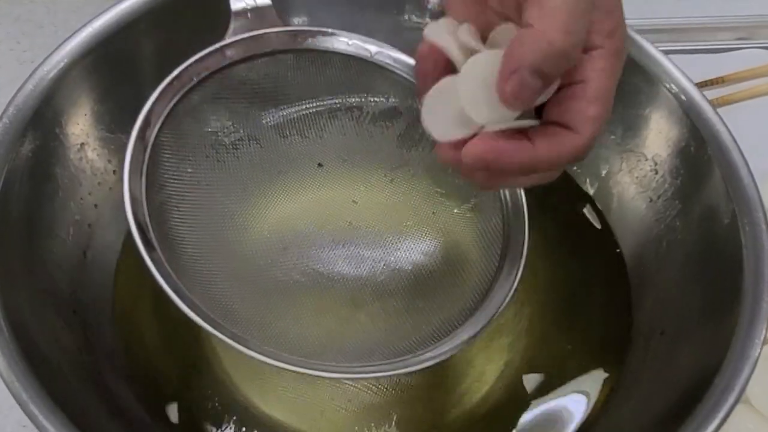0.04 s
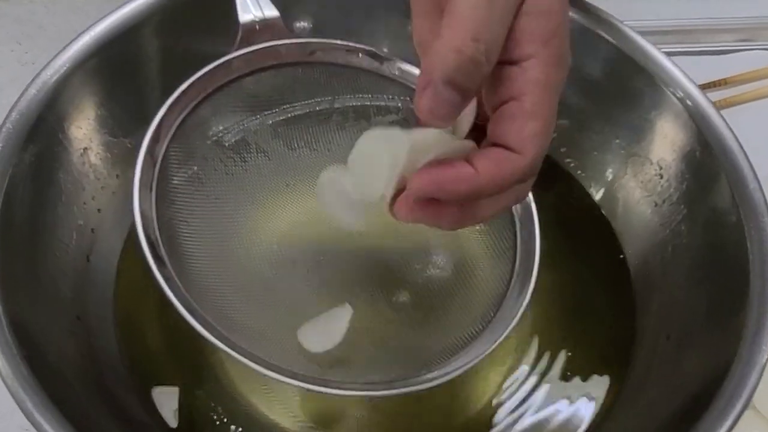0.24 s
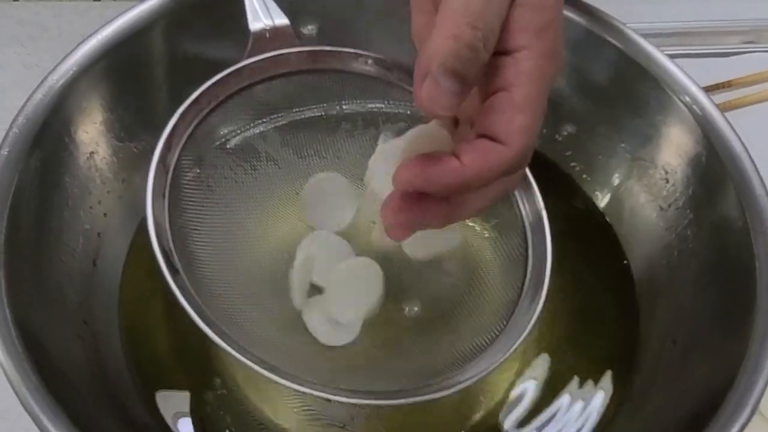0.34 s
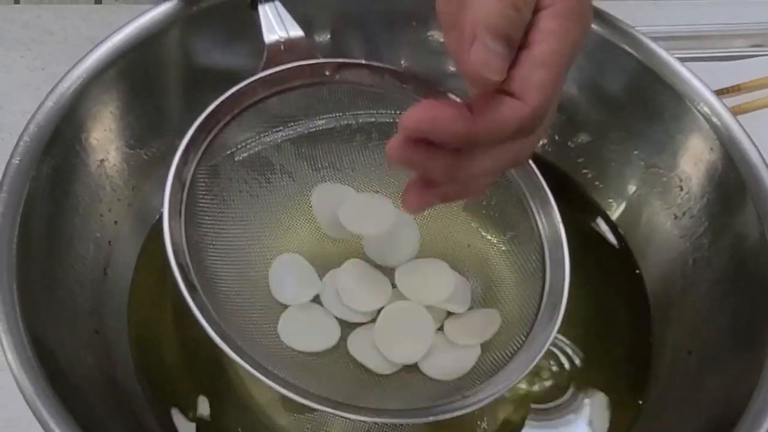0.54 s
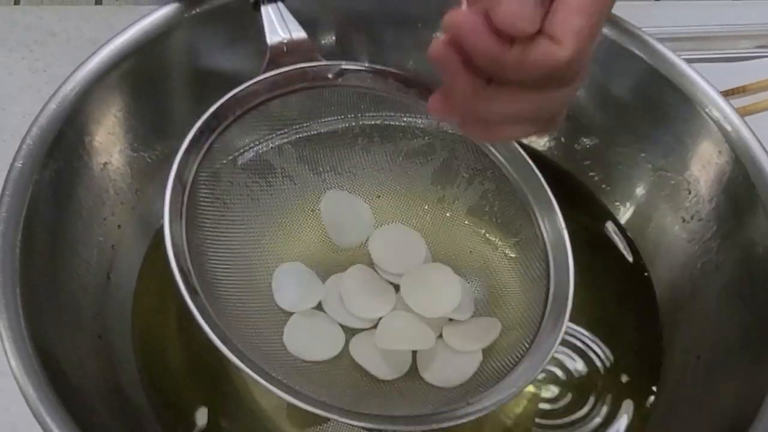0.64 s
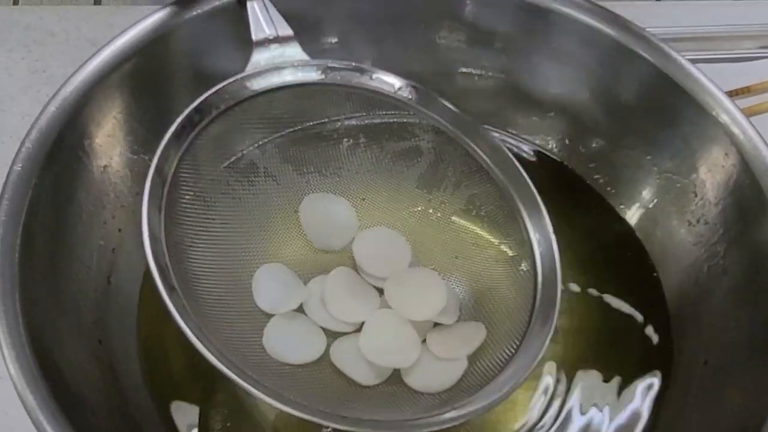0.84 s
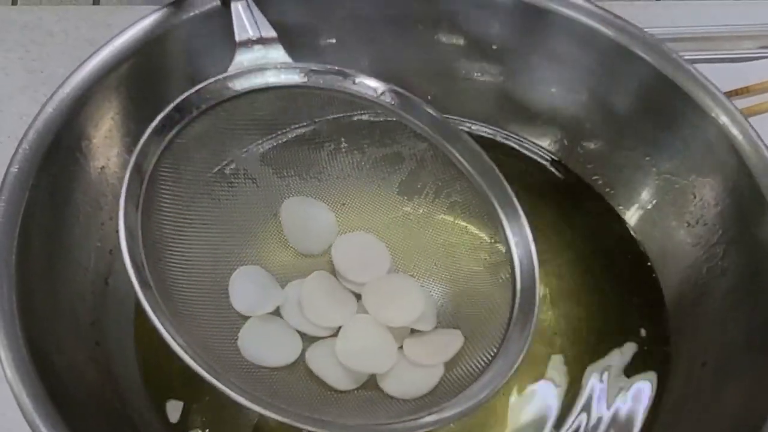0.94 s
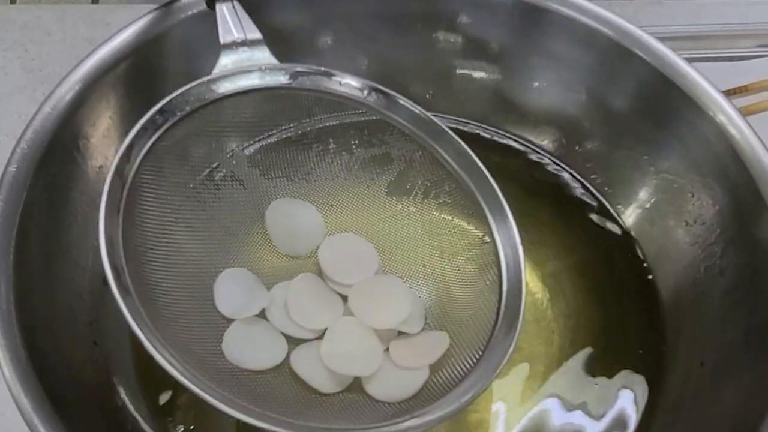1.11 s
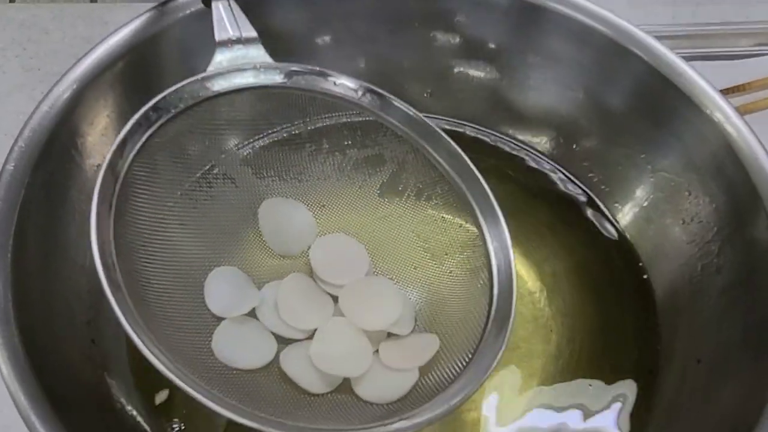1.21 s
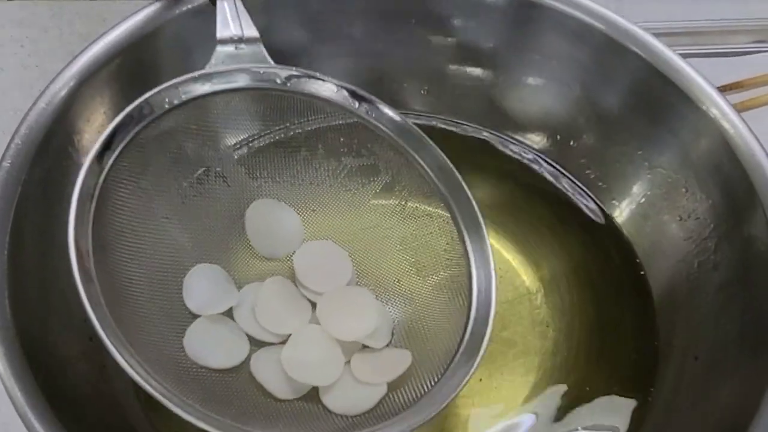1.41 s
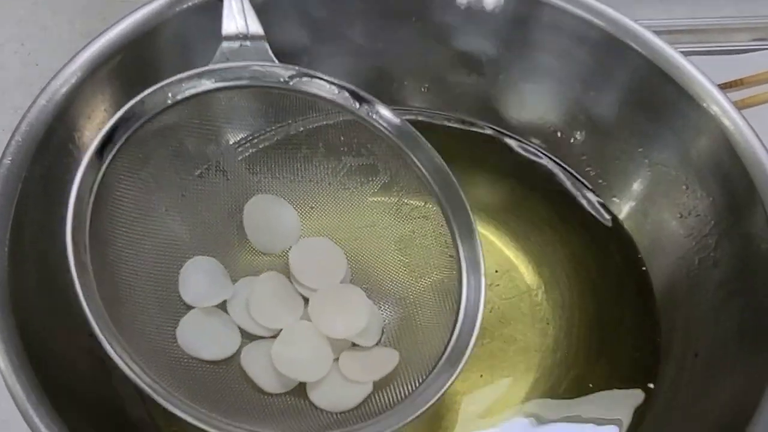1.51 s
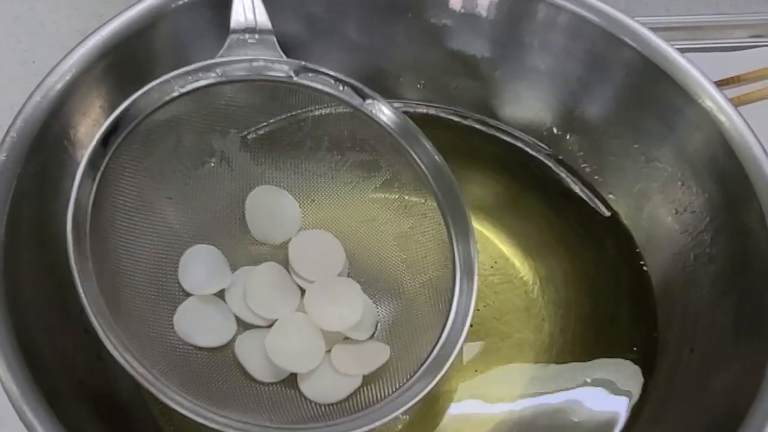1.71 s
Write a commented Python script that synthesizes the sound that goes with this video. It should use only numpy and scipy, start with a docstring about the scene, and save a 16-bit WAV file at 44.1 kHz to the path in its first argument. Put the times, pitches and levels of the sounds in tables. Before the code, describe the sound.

Dry chips click and rattle onto metal mesh over a low kitchen hum.

```python
"""A low kitchen hum, then hard dry chips drop into a wire strainer over a steel bowl of oil.
Heard on a pair of microphones, the chips click against each other and thud on the mesh,
whose wires buzz and rattle; the bowl and the kitchen ring briefly after them.
The strainer is moved with a soft swish, and near the end the oil spits and sizzles lightly."""
import sys
import numpy as np
from scipy import signal
from scipy.fft import rfft, irfft, next_fast_len
from scipy.io import wavfile
from scipy.ndimage import map_coordinates

SR = 44100
rng = np.random.default_rng(int(sys.argv[2]) if len(sys.argv) > 2 else 0)


def transcribe(signal):
    """Save signal, clipped to [-1, 1], as a 16-bit WAV file at the path in sys.argv[1]."""
    frames = np.atleast_2d(signal).T
    limited = np.clip(frames, -1, 1)
    pcm = np.round(limited * 32767).astype(np.int16)
    wavfile.write(sys.argv[1], SR, pcm)


N = 77175


def amp(db):
    """Decibels to gain."""
    return 10 ** (np.asarray(db) / 20)


def decay(t, t60):
    """A gain that falls 60 dB in t60 seconds."""
    return amp(-60 * t / t60)


def unit(x):
    """Scale to rms 1."""
    return x / np.sqrt(np.mean(x ** 2) + 1e-20)


def along(points, hz):
    """Read (Hz, value) points on a log frequency axis."""
    freqs, values = np.transpose(points)
    return np.interp(np.log(hz + 1), np.log(freqs + 1), values)


def level(points):
    """Gain per sample from (seconds, dB) points."""
    return amp(np.interp(np.arange(N) / SR, *np.transpose(points)))


def wobble(rate):
    """A smooth random curve, rate knots a second."""
    return map_coordinates(rng.standard_normal(int(N * rate / SR) + 4), [np.arange(N) * rate / SR])


def filtered(x, response):
    """x times a response of frequency."""
    n = x.shape[-1]
    padded = next_fast_len(2 * n)
    return irfft(rfft(x, padded) * response(np.fft.rfftfreq(padded, 1 / SR)), padded)[..., :n]


def coloured(x, colour):
    """x shaped by (Hz, dB) points, at rms 1."""
    return unit(filtered(x, lambda hz: amp(along(colour, hz))))


def resonant(x, peaks):
    """x through (Hz, width in Hz, dB) resonances, each at its own rms level."""
    return sum(amp(db) * unit(filtered(x, lambda f: 1 / (1 + (2 * (f - hz) / width) ** 2)))
               for hz, width, db in peaks)


LEFT_DB = 1.2  # contacts sit left of centre: this much up on the left, down on the right

def place(out, start, sound, lag_spread_s=0.00015, pan_spread_db=0.5):
    """Add a contact at its own spot between the two microphones."""
    lag = rng.normal(0, lag_spread_s / 2)
    pan_db = LEFT_DB + rng.normal(0, pan_spread_db)
    for channel, side in zip(out, (1, -1)):
        part = channel[round((start - side * lag) * SR):][:len(sound)]
        part += amp(side * pan_db) * sound[:len(part)]


def grains(rate, spread_db, colour, kinds=8):
    """Tiny noise ticks in three streams of rate a second: left, right and shared."""
    t, streams = np.arange(SR // 100) / SR, np.zeros((3, N))
    for _ in range(kinds):
        ticks = (rng.random((3, N)) < rate / SR / kinds) * amp(spread_db * rng.uniform(-1, 1, (3, N)))
        burst = rng.standard_normal((3, len(t))) * decay(t, t60=0.0057)
        streams += signal.fftconvolve(ticks, burst, axes=1)[:, :N]
    return coloured(streams[:2] + streams[2], colour)


# How alike the two microphones hear the room. Each row: frequency in Hz, correlation.
LIKENESS = [(60, 1), (150, 0.94), (2000, 0.067), (8000, .1)]

def diffuse_noise(colour):
    """Noise from all around, alike in the bass and wide in the treble."""
    def mid_side_gains(hz):
        angle = np.arccos(np.clip(along(LIKENESS, hz), -1, 1)) / 2
        return np.array([np.cos(angle), np.sin(angle)])
    mid, side = filtered(rng.standard_normal((2, N)), mid_side_gains)
    return coloured(np.array([mid + side, mid - side]), colour)


# The kitchen's background. Each row: frequency in Hz, relative level in dB.
ROOM_TONE = [(20, -11), (45, -1.5), (85, -1.5), (200, -8), (450, -9), (900, -16.5), (2000, -20),
             (3500, -27), (7000, -37.5), (16000, -48.5)]
# Narrow resonances in it. Each row: centre in Hz, width in Hz, level in dB.
ROOM_PEAKS = [(330, 23, -74), (2028, 130, -68.5)]

def room_tone():
    """Nearly steady kitchen noise with two faint pitches in it."""
    peaks = resonant(rng.standard_normal((2, N)), ROOM_PEAKS)
    return amp(-58 + 0.42 * wobble(1.7)) * diffuse_noise(ROOM_TONE) + peaks


# The hum's swells. Each row: time in seconds, level of the fundamental in dB.
HUM_LEVEL = [(0, -44.5), (.15, -41.5), (.2, -43), (.28, -40), (.38, -43.5), (.55, -48), (.7, -51.5),
             (.93, -49), (1.02, -47), (1.12, -44), (1.19, -41.5), (1.28, -46.5), (1.38, -45), (1.6, -50.5),
             (1.75, -54)]
# Its overtones. Each row: harmonic number, level in dB against the fundamental.
HUM_OVERTONES = [(2, -14.5), (3, -25.5), (4, -25), (6, -21.5)]

def hum(pitch_hz=59.58):
    """A low hum, just right of centre, swells and sinks with its wavering overtones."""
    phase = 2 * np.pi * np.cumsum(pitch_hz + 0.377 * wobble(5.4)) / SR
    overtones = sum(amp(db + 1.8 * wobble(7.27)) * np.sin(k * phase + 0.46 * wobble(10))
                    for k, db in HUM_OVERTONES)
    return np.sqrt(2) * level(HUM_LEVEL) * (np.sin(phase) + overtones) * amp([[-0.6], [0.6]])


# Crowded modes of the steel bowl. Each row: centre in Hz, width in Hz, relative level in dB.
BOWL_MODES = [(2040, 310, -9.5), (3050, 280, -8), (7300, 600, -2.5), (8680, 1900, 2)]
# The kitchen's reverberation. Each row: frequency in Hz, relative level in dB.
TAIL_COLOUR = [(200, 5), (2500, 2.5), (5500, -3), (11000, -8), (16000, -2.5)]
# Its length. Each row: frequency in Hz, seconds to fall 60 dB.
TAIL_T60 = [(200, 0.66), (1500, 0.47), (8000, 0.64), (16000, 0.38)]

def bowl_and_kitchen(direct):
    """Close reflections off the bowl, its steel shimmer and, from farther off, the kitchen's tail."""
    t = np.arange(SR // 2) / SR
    shape = (2, len(t))
    reflections = rng.standard_normal(shape) * decay(t, t60=0.058) * (t > 0.0008)
    shimmer = resonant(rng.standard_normal(shape), BOWL_MODES) * decay(t, t60=0.56)
    hz, times, bands = signal.stft(coloured(rng.standard_normal(shape), TAIL_COLOUR), SR, nperseg=256)
    bands *= decay(times, along(TAIL_T60, hz)[:, None])
    tail = signal.istft(bands, SR, nperseg=256)[1][:, :len(t)] * (t > 0.004)
    response = sum(amp(db) * part / np.linalg.norm(part, axis=1, keepdims=True)
                   for part, db in ((reflections, -4.5), (shimmer, -21.5), (tail, -10.5)))
    return signal.fftconvolve(direct, response, axes=1)[:, :N]


# The strainer's move. Each row: time in seconds, level in dB.
SWISH_LEVEL = [(1.02, -81.5), (1.17, -54.5), (1.22, -58.5), (1.35, -70)]
# Its spectrum. Each row: frequency in Hz, relative level in dB.
SWISH_COLOUR = [(300, 2), (2000, 3), (6000, -16), (16000, -23.5)]

def strainer_swish():
    """One soft swell of noise as the strainer is moved."""
    return level(SWISH_LEVEL) * diffuse_noise(SWISH_COLOUR)


# Spectra of the oil's fizz and of one spit. Each row: frequency in Hz, relative level in dB.
FIZZ_COLOUR = [(150, 2.5), (1100, -3.5), (1900, 0.5), (4500, -1.5), (6000, -6.5), (9200, -5), (16000, -15)]
SPIT_COLOUR = [(1300, -4), (2600, 1.5), (3400, -3.5), (6200, -8), (8700, 3.5), (10500, -8)]
# The steel ringing along. Each row: centre in Hz, width in Hz, relative level in dB.
FIZZ_RING = [(1800, 80, -2.5), (2636, 42, -5.5), (4500, 110, -6.5), (8600, 70, -7)]
# Oil spitting in the bowl. Each row: start in seconds, level in dB.
SPITS = [(1.574, -45), (1.5944, -35.5), (1.6011, -42), (1.618, -41), (1.634, -41.5)]

def oil_sizzle(start_s=1.578, rise_s=0.018, fade_after_s=0.04, fade_db_per_s=88):
    """A few spits of oil over a fizz that swells, rings the steel and fades."""
    age = np.arange(N) / SR - start_s
    swell = np.clip(age / rise_s, 0, 1) * amp(-46 - fade_db_per_s * np.maximum(age - fade_after_s, 0))
    fizz = grains(rate=1200, spread_db=3.5, colour=FIZZ_COLOUR)
    out = swell * (fizz + amp(-16) * resonant(fizz, FIZZ_RING))
    t = np.arange(SR // 32) / SR
    for start, db in SPITS:
        spit = coloured(rng.standard_normal(len(t)), SPIT_COLOUR) * decay(t, t60=0.031)
        place(out, start, amp(db) * spit)
    return out


# Chips landing on the mesh. Each row: start in seconds, relative level in dB.
LANDINGS = [(0.2465, -26), (0.257, -29.5), (0.3266, -25), (0.3355, -23.5), (.3563, -32), (.372, -28.5),
            (0.3912, -27), (.405, -27.5), (.418, -32), (0.4255, -28.5), (0.4359, -33), (0.456, -30.5),
            (0.4703, -28), (.493, -31), (0.518, -31), (0.533, -32.5), (.6012, -35.5), (0.639, -51.5)]
# The basket's modes, then spectra of its wires. Each row: frequency in Hz, relative level in dB.
BASKET_MODES = [(1050, -10.5), (1285, -12.5), (1434, -7), (1640, -8), (1770, -17), (1965, -3.5),
                (2107, -6.5), (2950, -6)]
BUZZ_COLOUR = [(100, -7), (380, -26.5), (560, -8), (850, -10.5), (1350, 0.5), (2000, 1), (2550, -4),
               (3300, -2.5), (5000, -15), (15500, -12.5)]
RATTLE_COLOUR = [(300, -15.5), (1400, -11), (1980, 4.5), (2450, -3.5), (3700, -4.5), (9000, -18.5)]
# Chips jiggling on the wires. Each row: time in seconds, level in dB.
RATTLE_LEVEL = [(.31, -100), (.34, -42.5), (.49, -36.5), (.57, -53), (.75, -100)]

def strainer_mesh(attack_s=0.00012, ring_t60_s=0.17):
    """A landing buzzes the wires and rings the basket; the settling chips keep it rattling."""
    out, t = np.zeros((2, N)), np.arange(SR // 4) / SR
    for start, db in LANDINGS:
        detune = np.exp(rng.normal(0, 0.008))  # the shifting load detunes the basket
        buzz = coloured(rng.standard_normal(len(t)), BUZZ_COLOUR) * decay(t, t60=0.034)
        basket = ring([(hz * detune, mode_db, ring_t60_s) for hz, mode_db in BASKET_MODES], t)
        thud = (buzz + amp(-12) * basket) * (1 - np.exp(-t / attack_s))
        place(out, start, amp(db + 0.5) * thud)
    return out + level(RATTLE_LEVEL) * grains(rate=500, spread_db=8.9, colour=RATTLE_COLOUR)


def ring(modes, t):
    """A struck body's damped sines, each excited a little differently every time."""
    return sum(amp(db + rng.normal(0, 0.72)) * decay(t, t60) * np.sin(2 * np.pi * (hz * t + rng.random()))
               for hz, db, t60 in modes)


# Chip striking chip in the strainer. Each row: start in seconds, relative level in dB.
CLICKS = [(0.1137, -49), (0.133, -38), (0.1588, -50), (0.189, -39), (0.2283, -26.5), (.235, -29),
          (0.2573, -26), (0.2686, -32), (0.328, -23.5), (.3355, -25.5), (0.355, -18.5), (0.3612, -18),
          (0.3718, -28.5), (.378, -20.5), (0.3861, -18), (0.4043, -18), (0.418, -19.5), (0.4227, -22.5),
          (0.428, -25), (0.431, -21.5), (0.4358, -16.5), (0.4498, -20.5), (0.4578, -21), (0.4651, -26.5),
          (0.4729, -19), (0.4991, -21.5), (0.5057, -22.5), (0.5153, -18.5), (0.5214, -21.5),
          (0.5264, -20.5), (0.5296, -17.5), (0.533, -12), (0.5381, -25.5), (0.541, -26), (0.563, -28),
          (0.5995, -27.5), (0.6071, -30.5), (0.6151, -28), (0.6402, -29.5), (0.712, -39.5)]
# The dry crack of a contact. Each row: frequency in Hz, relative level in dB.
CRACK_COLOUR = [(1000, -18), (2500, -9.5), (4500, -3), (8000, -0.5), (15500, -3)]
# A chip's modes. Each row: frequency in Hz, relative level in dB, seconds to fall 60 dB.
CHIP_MODES = [(7660, -0.5, 0.0064), (8180, -1.5, 0.0067), (9735, -7, 0.0069), (13700, -1.5, 0.0015)]
# A soft touch loses body and top. Each row: frequency in Hz, dB lost per dB of softer touch.
SOFT_LOSS = [(2000, 0.96), (6000, 0), (14000, 1)]
# Small contacts in the sliding heap. Each row: time in seconds, level in dB.
SLIDING_LEVEL = [(.08, -74.5), (.13, -53.5), (.21, -65), (.26, -52), (.32, -54), (.38, -38), (.44, -31.5),
                 (.487, -41), (.535, -29), (.57, -57), (.63, -51), (.73, -86)]

def chips(attack_s=0.00037, soft_below_db=-32):
    """Each click is a crack plus a chip's brief ring; small contacts fill in as the heap slides."""
    out, t = np.zeros((2, N)), np.arange(SR // 32) / SR
    for start, db in CLICKS:
        size = np.exp(rng.normal(0, 0.026))
        force_db = db - soft_below_db
        crack = coloured(rng.standard_normal(len(t)), CRACK_COLOUR) * decay(t, t60=0.0075)
        ping = ring([(hz / size, mode_db, t60) for hz, mode_db, t60 in CHIP_MODES], t)
        ping *= amp(-6 + 0.44 * force_db)  # a harder touch rings more
        click = (crack + ping) * (1 - np.exp(-t / attack_s))
        click = filtered(click, lambda hz: amp(min(0, force_db) * along(SOFT_LOSS, hz)))
        onset_rms = np.std(click[t < 0.0015])
        place(out, start, amp(db - 1) * click / onset_rms)
    sliding = level(SLIDING_LEVEL) * grains(rate=620, spread_db=11.6, colour=CRACK_COLOUR)
    return out + sliding * amp([[LEFT_DB], [-LEFT_DB]])


# The top treble leans slightly to the right microphone.
# Each row: frequency in Hz, gain in dB added on the left and subtracted on the right.
TREBLE_TILT = [(6000, 0), (14000, -0.6)]

def scene():
    """Chips, mesh and oil in the bowl, over the kitchen's hum."""
    direct = chips() + strainer_mesh() + oil_sizzle()
    direct = filtered(direct, lambda hz: amp(along(TREBLE_TILT, hz) * [[1], [-1]]))
    return direct + bowl_and_kitchen(direct) + hum() + room_tone() + strainer_swish()


def record(dry):
    """Both channels keep nothing above 15880 Hz."""
    return filtered(dry, lambda hz: hz < 15880)


dry = scene()
out = record(dry)
transcribe(out)
```